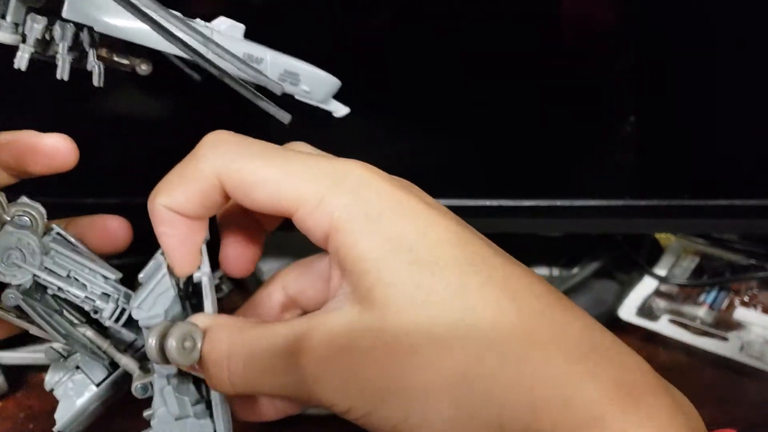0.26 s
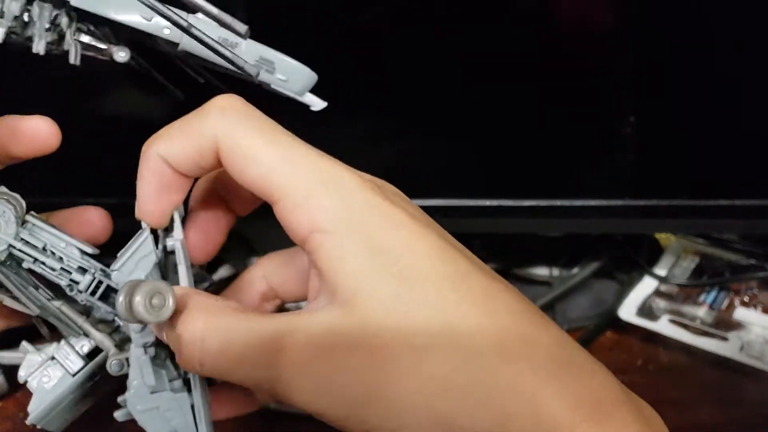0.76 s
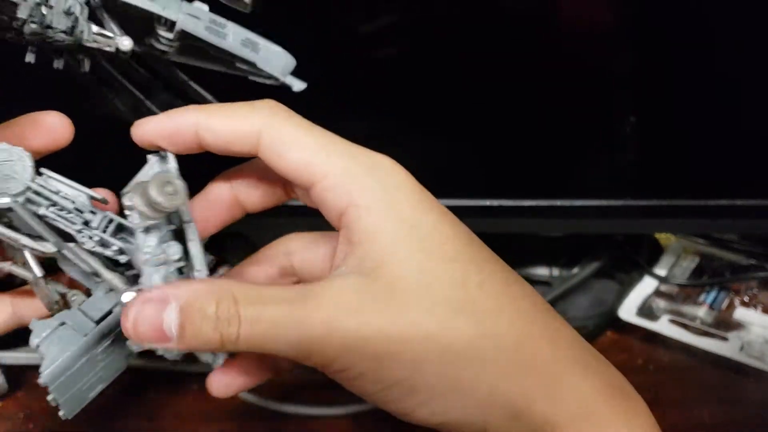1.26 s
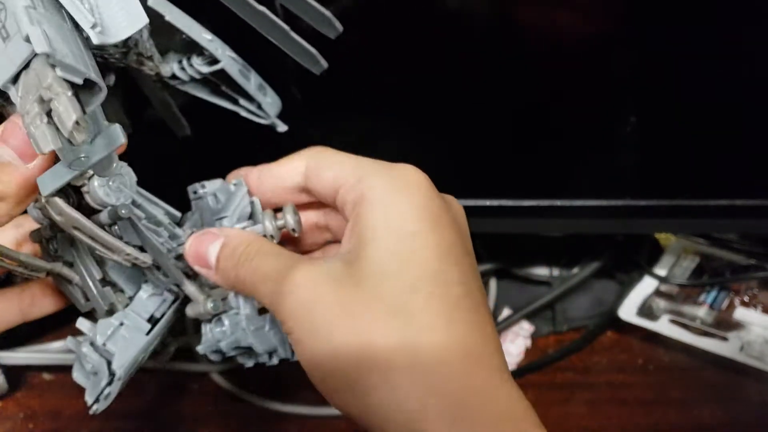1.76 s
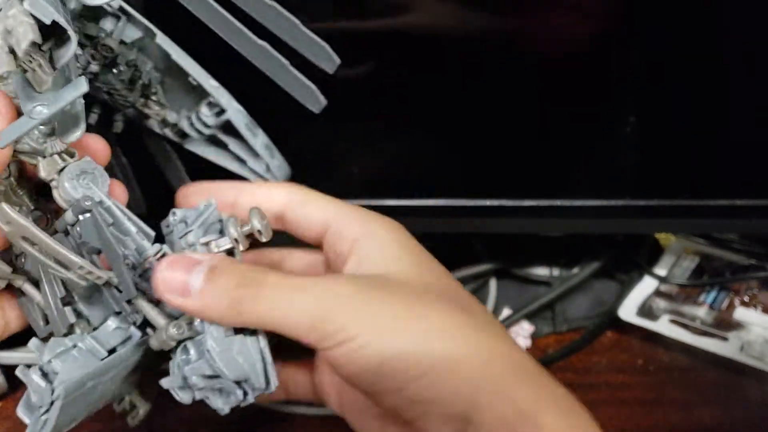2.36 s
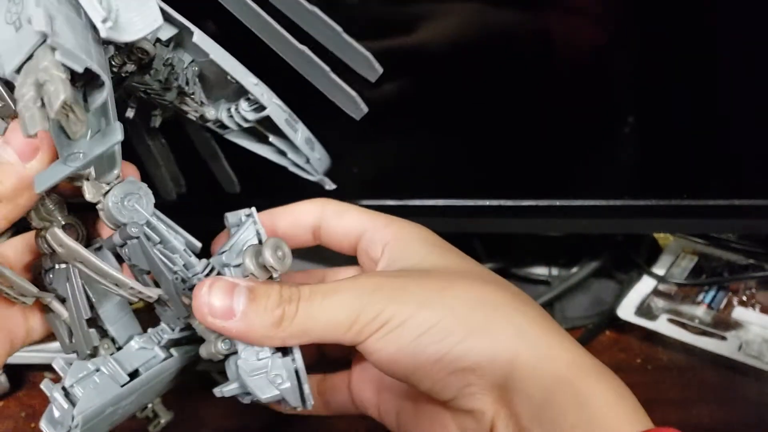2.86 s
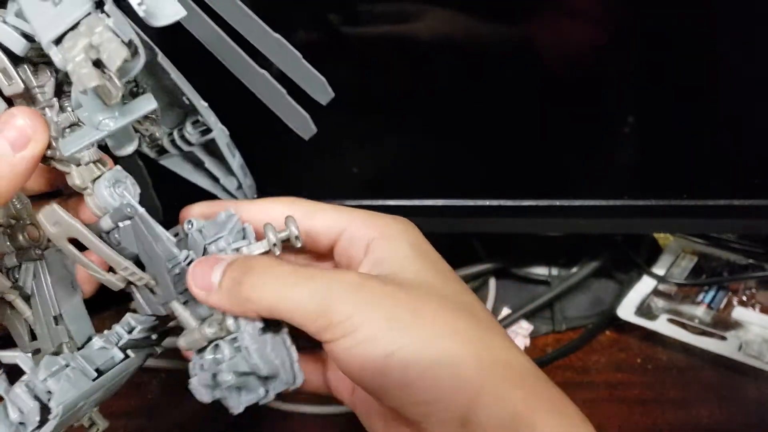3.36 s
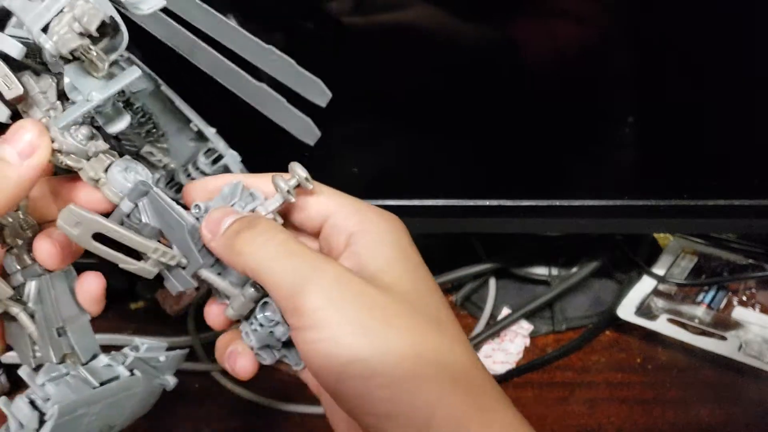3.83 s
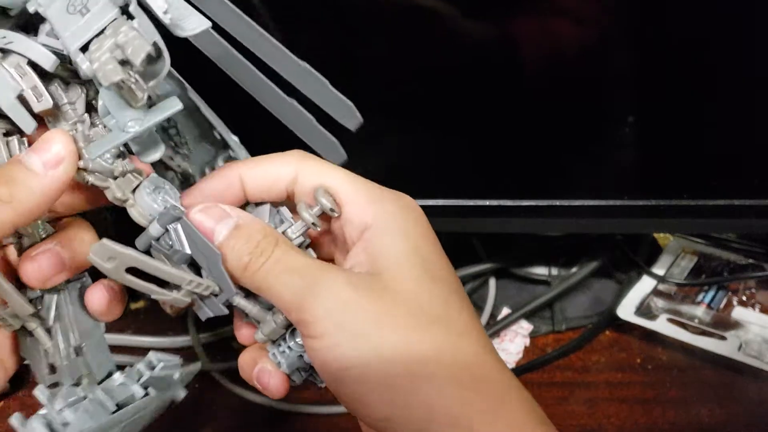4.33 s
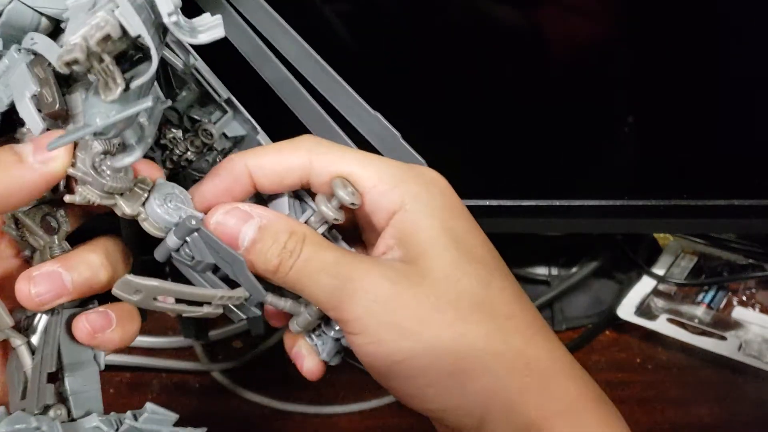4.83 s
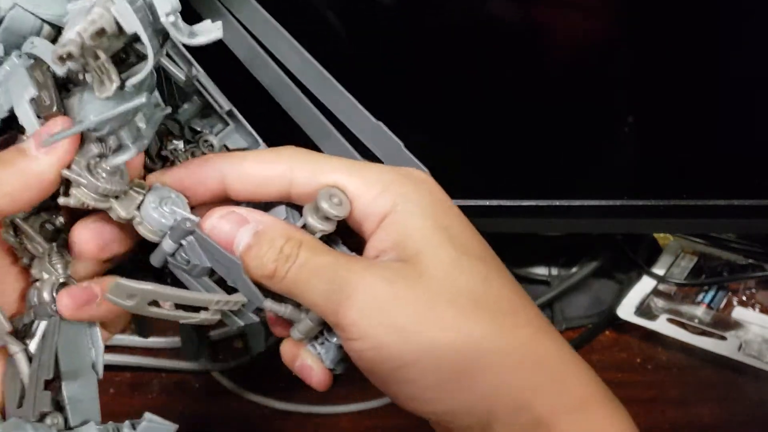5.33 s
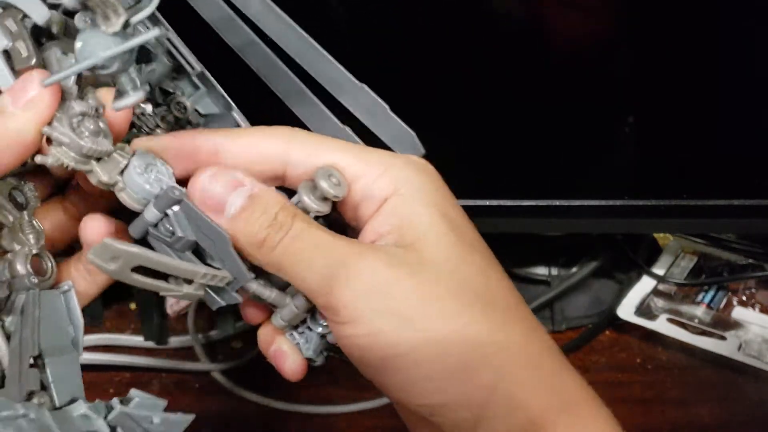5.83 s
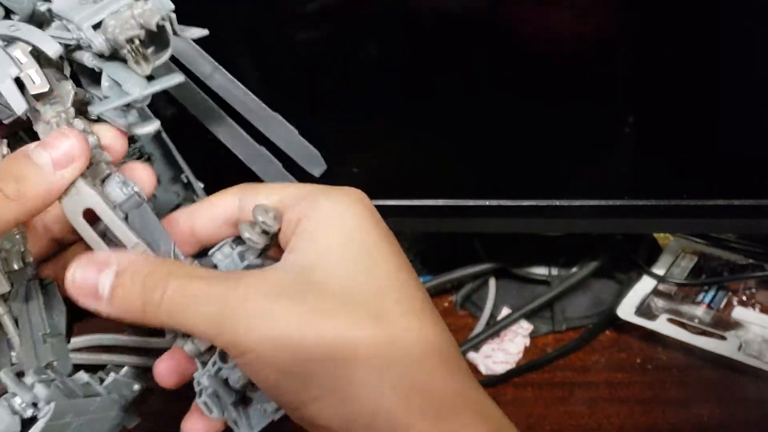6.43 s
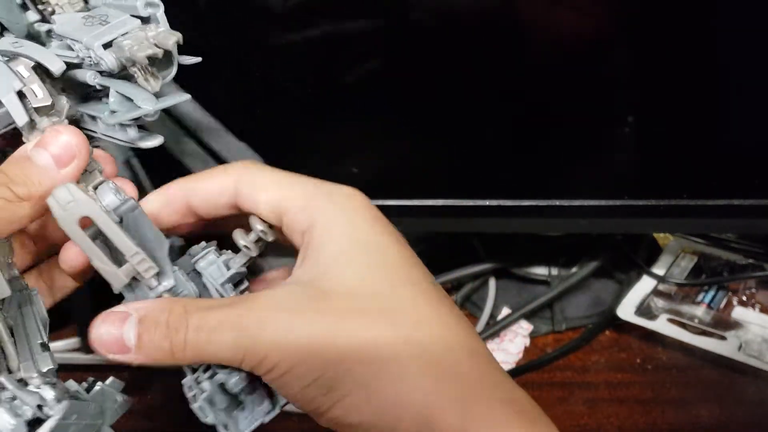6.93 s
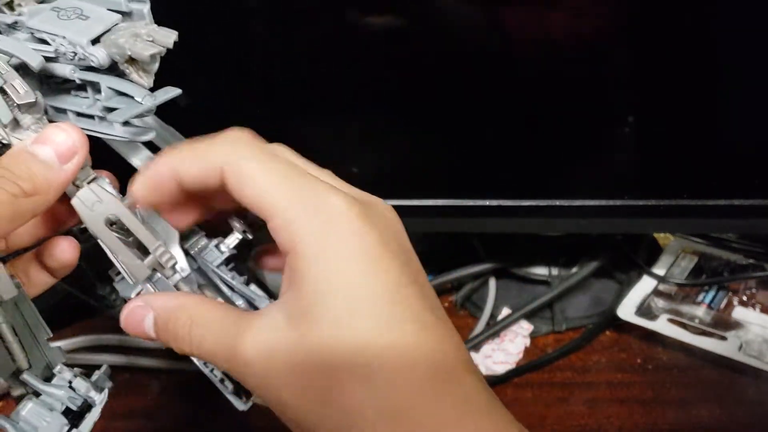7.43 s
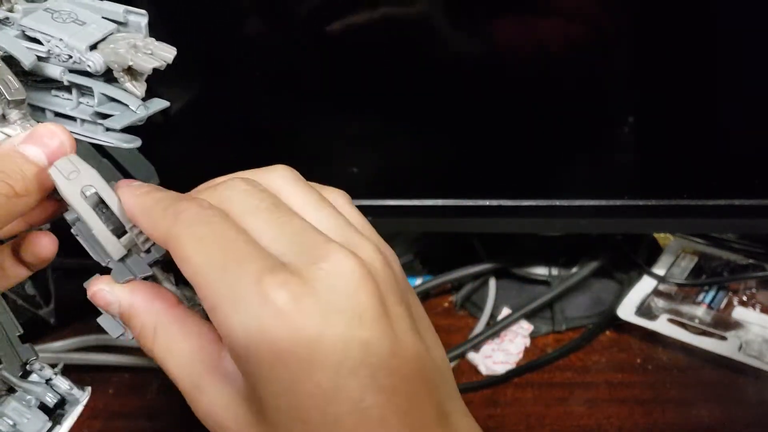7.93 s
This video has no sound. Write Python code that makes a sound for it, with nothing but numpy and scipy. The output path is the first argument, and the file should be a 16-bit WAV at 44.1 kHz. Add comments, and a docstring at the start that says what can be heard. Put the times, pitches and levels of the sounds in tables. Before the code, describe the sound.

Over the steady low hum and fan noise of an appliance in a small room, a plastic toy figure is bent and adjusted right in front of a phone microphone. A few crisp clicks come first, then faint rubbing, then busier runs of thin clicks and brief scrapes. Near the end a single dull table knock lands together with a sharp snap, followed by a few softer scrapes.

```python
"""In a small room, two hands turn the joints of a plastic toy figure just in front of a phone.
Parts rub in short scrapes, where stick-slip friction drives the resonances of the thin shells;
catches let go and ring the shells by impact, and one dull knock comes through the table.
Throughout, an appliance hums at twice the mains frequency over the rumble and hiss of its fan."""
import sys
import numpy as np
from scipy import signal
from scipy.fft import rfft, irfft
from scipy.io import wavfile
from scipy.ndimage import uniform_filter1d

SR = 44100
rng = np.random.default_rng(int(sys.argv[2]) if len(sys.argv) > 2 else 0)


def file_out(sig):
    """Save sig as 16-bit WAV at sys.argv[1]."""
    # one column per channel
    cols = np.atleast_2d(sig).T
    # limit, then scale
    lim = np.clip(cols, -1, 1)
    pcm = np.round(lim * 32767).astype(np.int16)
    wavfile.write(sys.argv[1], SR, pcm)


N = 360856

# modes of the toy's big panels: centre_hz, width_hz, gain_db
PANEL_MODES = [(1828, 390, 1.5), (2415, 420, 1.5)]
# modes of small edges and the microphone port: centre_hz, width_hz, gain_db
EDGE_MODES = [(8740, 2100, -5), (11680, 3600, -0.5), (14100, 3700, -0.5)]
# stereo balance of the toy: frequency_hz, left_minus_right_db
TOY_BALANCE = [(700, 1.5), (2000, -5.5), (4500, -2.5), (8000, 0.5), (14000, 8.5)]
TOY_COHERENCE = 0.027
LEFT_LAG_S = 1.8e-4  # the appliance is nearer the right port


def undb(db):
    return 10 ** (np.asarray(db) / 20)


def rms(x):
    return np.sqrt(np.mean(abs(x) ** 2))


def along(table, hz):
    """Interpolates (frequency_hz, value) points on a logarithmic frequency axis."""
    points_hz, values = np.transpose(table)
    return np.interp(np.log(np.maximum(hz, 1)), np.log(points_hz), values)


def modes(table, hz):
    """Modal superposition: the responses of damped resonators add, here with alternating sign."""
    return sum((-1) ** k * undb(db) * 1j * hz * width / (centre ** 2 - hz ** 2 + 1j * hz * width)
               for k, (centre, width, db) in enumerate(table))


def stereo(a, b, coherence, balance_db):
    """Partial coherence: left and right are the sum and difference of two independent spectra."""
    coherence = np.clip(coherence, 0, 1)
    mid, side = a * np.sqrt((1 + coherence) / 2), b * np.sqrt((1 - coherence) / 2)
    return np.array([(mid + side) * undb(balance_db / 2), (mid - side) * undb(-balance_db / 2)])


def wander(rate_hz):
    """Random modulation: held values, smoothed twice, with a spread of order 1."""
    hold = int(SR / rate_hz)
    steps = np.repeat(rng.standard_normal(N // hold + 1), hold)
    return 0.92 * uniform_filter1d(uniform_filter1d(steps, hold), hold)[:N]


def appliance_hum():
    """Forced vibration gives mains harmonics and motor tones; the strongest is nearly steady."""
    # one per tone: pitch_hz
    pitches = [120.01, 126.5, 175.0, 360.0, 480.0, 1212]
    # strength of each tone: level_db, waver_db
    levels = [(-48.5, -0.32), (-68, 8), (-69.5, 2), (-71, 2), (-80.5, 8), (-83.5, -1.5)]
    t = np.arange(N) / SR - np.array([[LEFT_LAG_S], [0]])
    tones = 0
    for hz, (level_db, waver_db) in zip(pitches, levels):
        amplitude = np.sqrt(2) * undb(level_db + waver_db * wander(2.595))
        tones += amplitude * np.sin(2 * np.pi * (hz * t + rng.random()))
    return tones * undb([[-0.7], [0.7]])  # louder on the right


def fan_noise(level_db=-50.5):
    """Broadband air noise excites the room's standing waves; six bands swell independently."""
    # spectral density of the air noise: frequency_hz, relative_db
    spectrum = [(12, -35), (30, -22.5), (50, -9), (74, -4), (105, -5.5), (135, -7), (200, -9), (310, -20.5),
                (600, -24.5), (950, -43), (1900, -34), (3000, -47.5), (4500, -42.5), (7500, -50.5),
                (13000, -47.5), (16000, -45.5)]
    # standing waves of the room: centre_hz, width_hz, gain_db
    room_modes = [(73.4, 4.25, 7), (106, 8.4, -2), (133, 27, 1.5), (212, 21, 3), (237, 15, 0.5)]
    # likeness of left and right: frequency_hz, coherence
    coherence = [(60, 0.96), (150, 1), (290, 0.58), (640, 0.51), (1400, 0)]
    # stereo balance: frequency_hz, left_minus_right_db
    balance = [(60, -2.5), (110, -1.5), (200, -1), (380, -6.5), (700, -3.5), (1290, -20), (2380, -12.5),
               (4400, -10), (8120, -0.5), (15000, 0.5)]
    # slow swell of each band, deepest in the rumble: centre_hz, swell_db
    swells = [(70, 4), (250, -0.5), (1200, 0.18), (3200, -3), (6000, -0.3), (12000, 2)]
    hz = np.fft.rfftfreq(N, 1 / SR)
    a, b = rfft(rng.standard_normal((2, N)))
    room_db = sum(db / (1 + (2 * (hz - centre) / width) ** 2) for centre, width, db in room_modes)
    air = stereo(a, b, along(coherence, hz), along(balance, hz)) * undb(along(spectrum, hz) + room_db)
    air[0] *= np.exp(-2j * np.pi * hz * LEFT_LAG_S)
    octaves = np.log2([centre for centre, _ in swells])
    out = 0
    for k, (_, swell_db) in enumerate(swells):
        band = np.interp(np.log2(hz + 1), octaves, np.arange(len(swells)) == k)
        out += irfft(air * band, N) * undb(swell_db * wander(2.173))
    return undb(level_db) * out / rms(out)


def shells(hz, spread_db=2):
    """The point of excitation sets the strength of each shell mode, so every touch differs."""
    # modes of the thin shells: centre_hz, width_hz, gain_db
    shell_modes = [(3200, 770, -0.5), (4400, 890, 6.5), (5380, 1800, 1), (7600, 530, 0)]
    return modes([(centre, width, db + spread_db * rng.standard_normal())
                  for centre, width, db in shell_modes], hz)


def small_parts(hz, top_db, count=7):
    """Loose little pieces add narrow resonances, new at every touch and fainter towards the top."""
    heights, weaknesses = rng.random((count, 2)).T
    return modes([(2800 * 5 ** height, 130 * 5 ** height, top_db - 7 * height - 6 * weakness)
                  for height, weakness in zip(np.sort(heights), weaknesses)], hz)


def scrapes(size=16384):
    """Stick-slip friction: dense, uneven slips drive the shells, panels, edges and hollow body."""
    # parts sliding on each other: start_s, pressed_s, shell_db, ring_hz, panel_db, edge_db, hollow_db
    strokes = [(0.55, 0.07, -75, 2550, -71, -86, -74), (0.641, 0.034, -61.5, 3620, -59.5, -64, -67.5),
               (0.828, 0.064, -63.5, 3550, -73, -64.5, -73), (0.952, 0.13, -76, 2550, -76, -82, -78),
               (1.203, 0.023, -80, 7580, -78, -82, -84), (1.54, 0.032, -65, 4970, -94, -70, -90),
               (1.656, 0.031, -73, 3450, -78, -83, -87), (2.108, 0.11, -70, 6150, -90, -71.5, -88),
               (2.267, 0.026, -64.5, 5860, -84, -66, -90), (2.34, 0.032, -62.5, 4000, -89, -67, -92),
               (2.431, 0.034, -69, 4700, -71, -67, -74), (2.54, 0.024, -65, 3800, -62, -66, -67),
               (2.709, 0.026, -71, 2780, -66, -89, -67), (2.732, 0.045, -49, 2770, -57, -45.5, -51.5),
               (2.844, 0.017, -71, 2800, -64, -89, -58), (2.967, 0.0086, -67.5, 3300, -68, -87, -69),
               (3.119, 0.055, -63, 2650, -67.5, -71, -83), (3.383, 0.032, -64.5, 6500, -72, -60, -85),
               (3.585, 0.042, -62.5, 7440, -73, -63, -69), (3.676, 0.039, -65, 4170, -70, -69, -71),
               (3.796, 0.046, -58, 4000, -68.5, -58, -72), (3.924, 0.062, -61, 3180, -67.5, -63.5, -76),
               (4.181, 0.067, -72, 2800, -70, -84, -75), (4.286, 0.037, -74, 4000, -76, -75, -77),
               (4.873, 0.051, -51, 2940, -58, -59, -58.5), (5.084, 0.0079, -65.5, 3140, -65, -67, -63.5),
               (5.272, 0.046, -67.5, 3100, -73, -79, -78), (5.678, 0.022, -60.5, 3170, -66, -69, -59),
               (5.822, 0.014, -61, 2930, -62, -68, -69), (5.896, 0.075, -66, 3440, -74, -68, -77),
               (6.259, 0.023, -55, 4580, -63, -67, -70), (6.359, 0.074, -64, 3250, -70, -68, -74),
               (6.525, 0.029, -59.5, 3500, -63.5, -57.5, -66), (6.631, 0.008, -60, 3150, -58, -65, -57.5),
               (6.842, 0.069, -65.5, 4000, -74, -70, -74), (6.948, 0.036, -69, 4120, -83, -65, -83),
               (7.127, 0.023, -71, 5300, -73, -67.5, -82), (7.569, 0.12, -69, 4650, -76, -76, -69.5),
               (7.69, 0.026, -55, 3450, -58.5, -55.5, -67), (7.88, 0.067, -71.5, 3040, -76, -87, -75),
               (8.13, 0.027, -83, 4870, -78, -84, -72)]
    # modes of the hollow body: centre_hz, width_hz, gain_db
    hollow_modes = [(693, 200, 12.5), (1172, 210, 9.5), (1435, 250, 6)]
    rise_share, body_t60_s, edge_t60_s, pan_db = 0.55, 0.32, 0.19, -3
    out = np.zeros((2, N + size))
    t, hz = np.arange(size) / SR, np.fft.rfftfreq(size, 1 / SR)
    catching_db = 1.5 * np.resize(wander(250), N + size)  # the grip comes and goes every few ms
    grip = undb(2.2 * rng.exponential(size=N + size) + catching_db)
    for start_s, pressed_s, shell_db, ring_hz, panel_db, edge_db, hollow_db in strokes:
        i = int(start_s * SR)
        pressure = np.sin(np.pi / 2 * np.minimum(t / (rise_share * pressed_s), 1)) ** 2
        slips = rng.standard_normal((2, size)) * pressure * grip[i:i + size] / rms(grip[i:i + size])
        released_s = np.maximum(t - pressed_s, 0)
        body_drive = rfft(slips * undb(-60 * released_s / body_t60_s))
        edge_drive = rfft(slips * undb(-60 * released_s / edge_t60_s))
        lowpass = 1 / (1 + 1j * hz / (2.9 * ring_hz))  # larger, lower-ringing parts carry less treble
        ring = modes([(ring_hz, 0.088 * ring_hz, 6.5)], hz)
        shell = ring + lowpass * shells(hz) + small_parts(hz, top_db=0)
        paths = [(shell_db, shell, body_drive),
                 (panel_db, modes(PANEL_MODES, hz) ** 2, body_drive),
                 (edge_db, modes(EDGE_MODES, hz) ** 2, edge_drive),
                 (hollow_db, modes(hollow_modes, hz) ** 2, body_drive)]
        a, b = sum(undb(db) * drive * response / rms(response) for db, response, drive in paths)
        out[:, i:i + size] += irfft(stereo(a, b, TOY_COHERENCE, along(TOY_BALANCE, hz) + pan_db), size)
    return out[:, :N]


def catch_clicks(size=8192):
    """Impact excitation: a catch's short rattle rings one shell most; reflections add a faint tail."""
    # catches letting go: start_s, level_db, ring_hz, panel_db, edge_db, pan_db (positive is left)
    catches = [(0.6382, -37.5, 4760, -8, -5, -4), (0.657, -45, 2220, 3, -22, 0),
               (0.702, -28.5, 4530, -7.5, -2, -1), (0.819, -45, 4000, -8, -11, -4),
               (0.8765, -52, 4160, -1, 2, -1.5), (2.196, -61, 5230, -11, -10, -1),
               (2.2582, -42.5, 6900, -15, 2, -1), (2.3, -52, 4070, -10, -17, -4),
               (2.349, -50, 4400, -10, -14, -2), (2.369, -51.5, 5630, -11.5, -16, -6),
               (2.4565, -45, 4740, -4.5, -2, 0), (2.4916, -49.5, 4300, 2, -13, -4),
               (2.505, -44.5, 3250, -2, -21, -5), (2.5532, -32.5, 3530, -3.5, -27, -7),
               (2.581, -40, 3800, 6, -12, -5), (2.714, -50, 2620, 0, -25, -6),
               (2.7605, -40, 2650, 2, -14, -1), (2.8714, -55, 4970, 1, -20, -6),
               (2.9732, -51, 4500, 3, -9, -2), (3.007, -58, 4500, -8, -20, -2),
               (3.134, -48.5, 4470, 3, -9, 0), (3.152, -36, 2400, -31, -22, -3),
               (3.17, -41, 2570, -20, -23, -2), (3.2742, -52, 3220, 3.5, -18, -7),
               (3.454, -53, 4500, -5, 0, 0), (3.5402, -49, 5550, 2.5, -7, -7),
               (3.917, -46.5, 4540, 1, -9, 0), (3.9988, -49, 3270, -9.5, -7, 0),
               (4.264, -48.5, 3350, 8, -20, -4), (5.0835, -42.5, 3170, -5, -15, -5),
               (5.103, -48, 3170, 1, -4, -5), (5.2645, -46.5, 5200, 3.5, -8, -4),
               (5.2978, -46.5, 4930, 1, -16, -6), (5.314, -47.5, 5060, 4, -18, 1),
               (5.633, -32.5, 3200, -5, -19, -6), (5.642, -39.5, 4480, -8, -10, 0),
               (5.663, -41, 4460, -9, -12, -7), (5.668, -30, 3950, -8, -10, -3),
               (5.718, -50, 7500, -10, -2, 0), (5.7348, -48, 3300, -0.5, -11, -3),
               (5.8234, -37.5, 2980, 4, -13, -1), (5.833, -44.5, 2600, 3, -15, 0),
               (5.8646, -54, 3000, -1.5, -6, 9), (5.9116, -43, 3740, -6, -8, -2),
               (6.267, -38.5, 3290, -12, -22, -2), (6.29, -38, 5100, -3, -10, -3),
               (6.424, -47.5, 3160, -13, -25, -7), (6.545, -32.5, 3430, -7, -18, -1),
               (6.6397, -40.5, 3030, 0, -7, -1), (6.647, -41.5, 5760, 0, -8, -7),
               (6.675, -29, 3330, -21, -4, 0), (6.8716, -52, 4040, -3, -7, 0),
               (6.897, -51, 5870, -0.5, -13, 0), (7.889, -52.5, 3180, -1, -6, -5)]
    rise_s, rattle_t60_s, tail_db, tail_t60_s = 0.001, 0.016, -22, 0.11
    out = np.zeros((2, N + size))
    t, hz = np.arange(size) / SR, np.fft.rfftfreq(size, 1 / SR)
    attack = (1 - np.exp(-t / rise_s)) ** 2
    crack = 1 + 0.44 * np.exp(-(t / 0.00092) ** 2)  # the first contact is the hardest
    decay = crack * undb(-60 * t / rattle_t60_s) + undb(tail_db - 60 * t / tail_t60_s)
    for start_s, level_db, ring_hz, panel_db, edge_db, pan_db in catches:
        a, b = rfft(rng.standard_normal((2, size)) * attack * decay)
        lowpass = 1 / (1 + 1j * hz / (1.6 * ring_hz))
        ring = modes([(ring_hz, 0.076 * ring_hz, 2.5)], hz)
        shell = ring + lowpass * (undb(-7) * shells(hz) + small_parts(hz, top_db=-9))
        panels = undb(panel_db) * modes(PANEL_MODES, hz)
        edges = undb(edge_db) * modes(EDGE_MODES, hz)
        rattle = stereo(a, b, TOY_COHERENCE, along(TOY_BALANCE, hz) + pan_db)
        click = irfft((shell + panels + edges) * rattle, size)
        rough_peak = 3 * rms(click[:, :220])  # over the first 5 ms
        i = int(start_s * SR)
        out[:, i:i + size] += undb(level_db) * click / rough_peak
    return out[:, :N]


def table_knock(start_s=6.6355, rise_s=0.0016):
    """Damped free vibration: one low mode sounds through the table, alike on both sides."""
    # the dull knock: pitch_hz, t60_s, level_db
    knock = (165, 0.039, -25)
    pitch_hz, t60_s, level_db = knock
    t = np.maximum(np.arange(N) / SR - start_s, 0)
    envelope = undb(level_db - 60 * t / t60_s) * (1 - np.exp(-t / rise_s))
    return -envelope * np.sin(2 * np.pi * pitch_hz * t)


def scene():
    """Superposition: the sound pressures of the toy, the table and the appliance add."""
    return catch_clicks() + scrapes() + table_knock() + appliance_hum() + fan_noise()


def record(dry, cutoff_hz=15850):
    """Band limiting: the phone's steep low-pass filter removes the highest treble."""
    return signal.sosfilt(signal.ellip(10, 0.2, 70, cutoff_hz, fs=SR, output="sos"), dry)


dry = scene()
out = record(dry)
file_out(out)
```